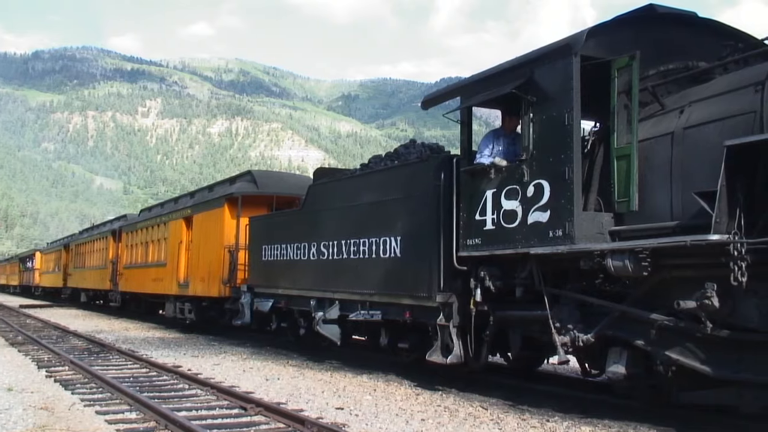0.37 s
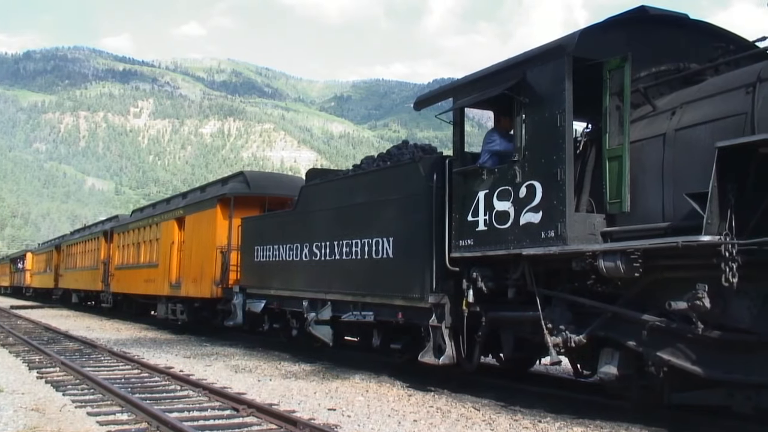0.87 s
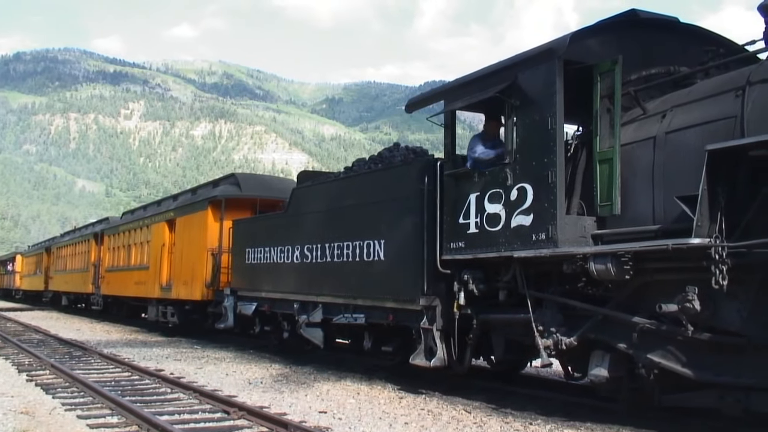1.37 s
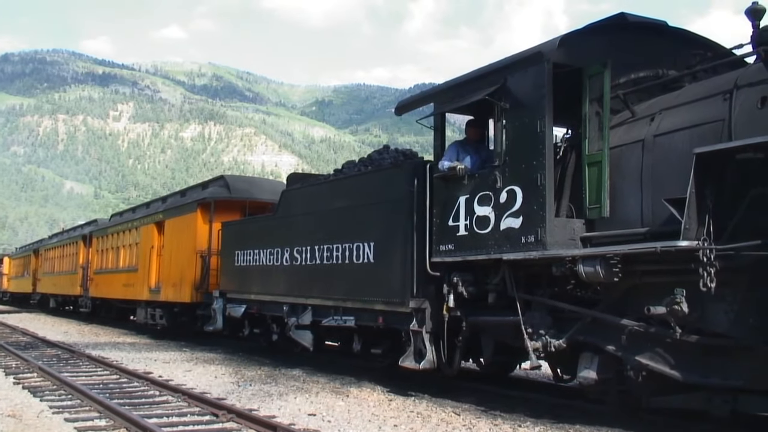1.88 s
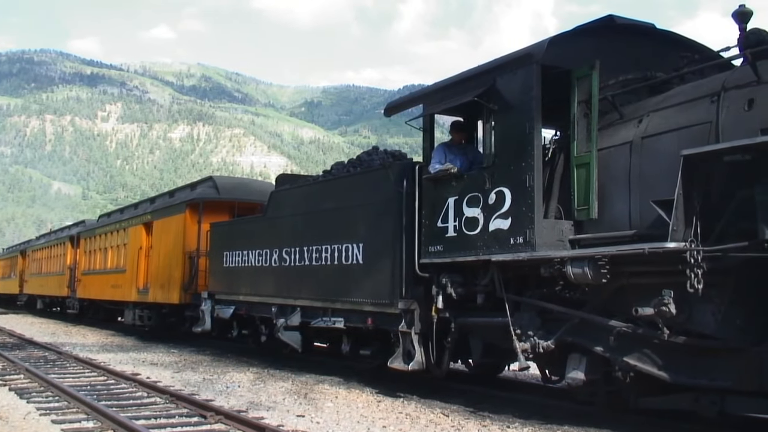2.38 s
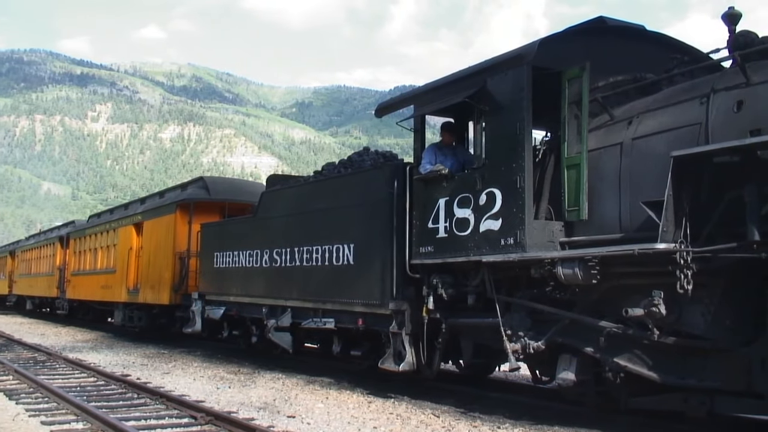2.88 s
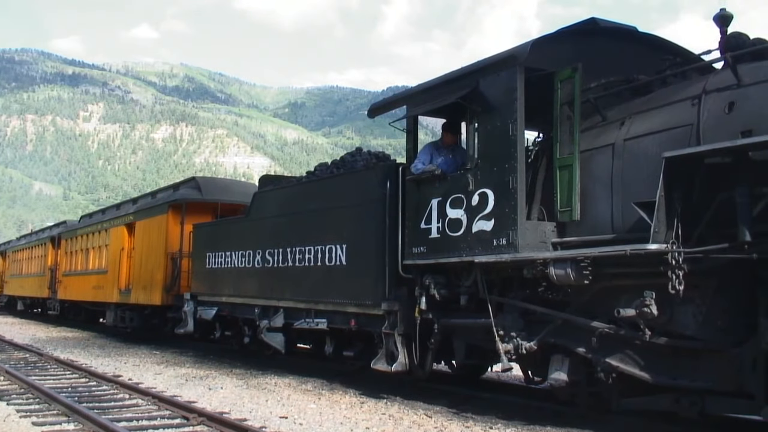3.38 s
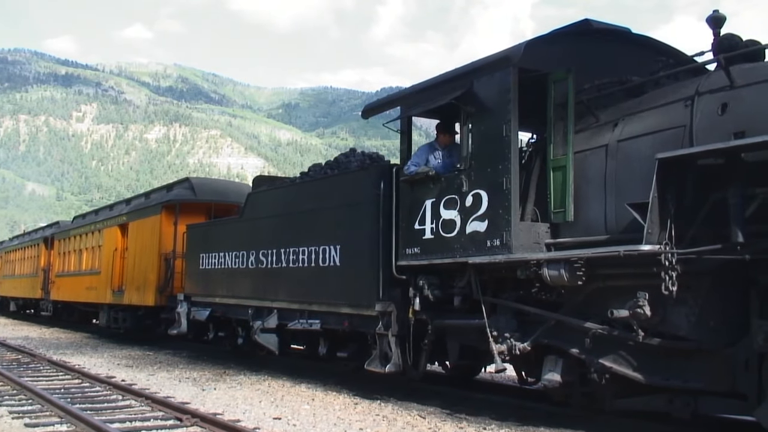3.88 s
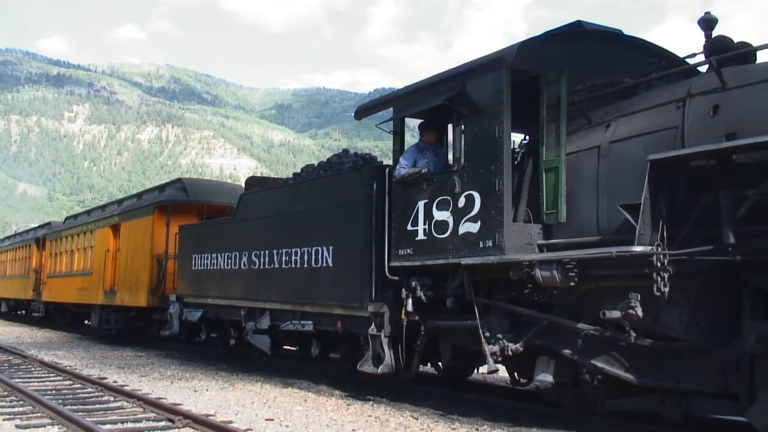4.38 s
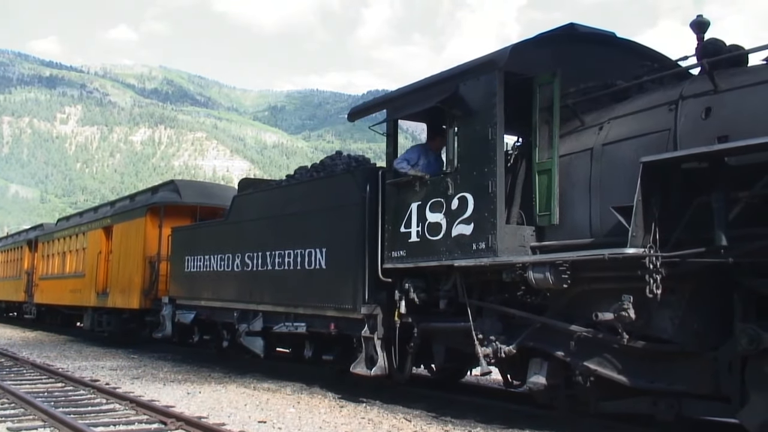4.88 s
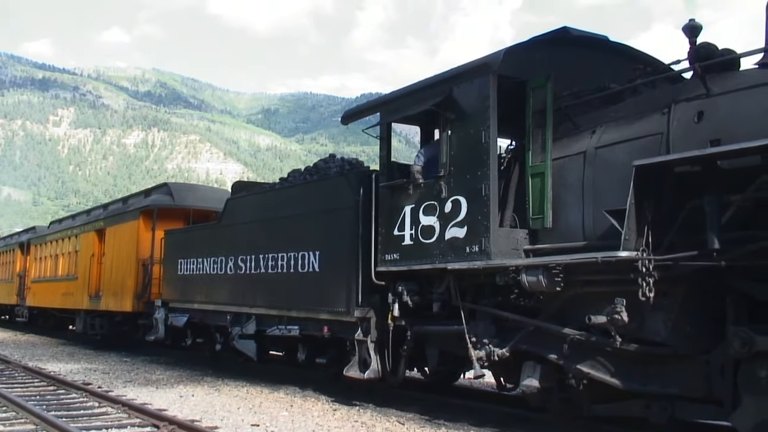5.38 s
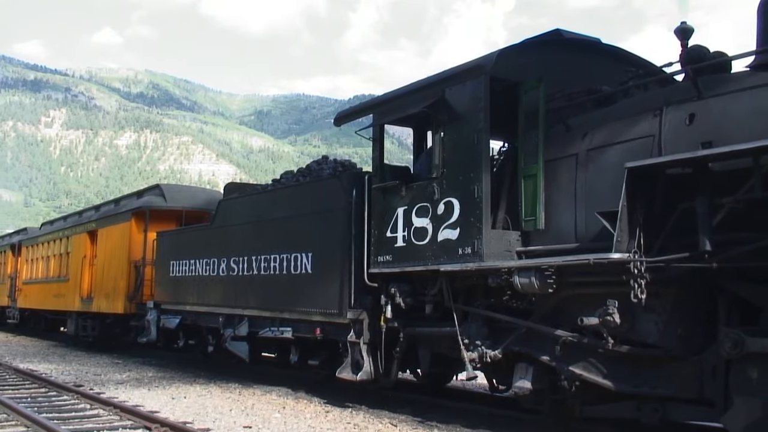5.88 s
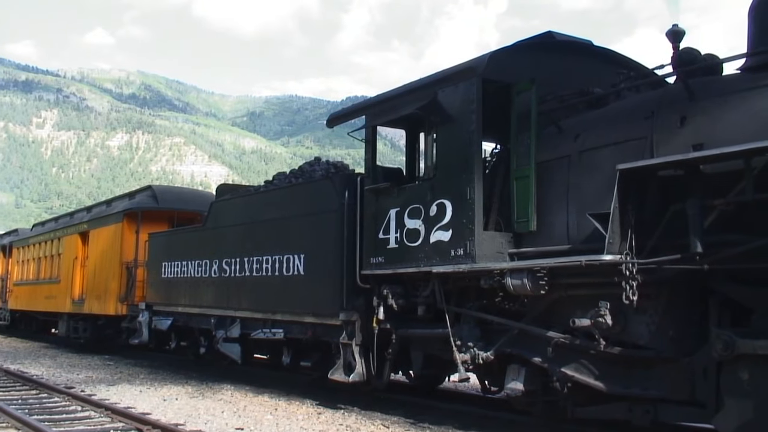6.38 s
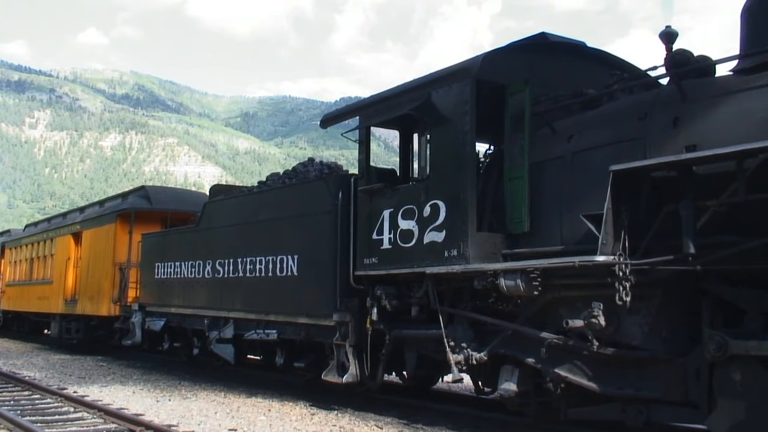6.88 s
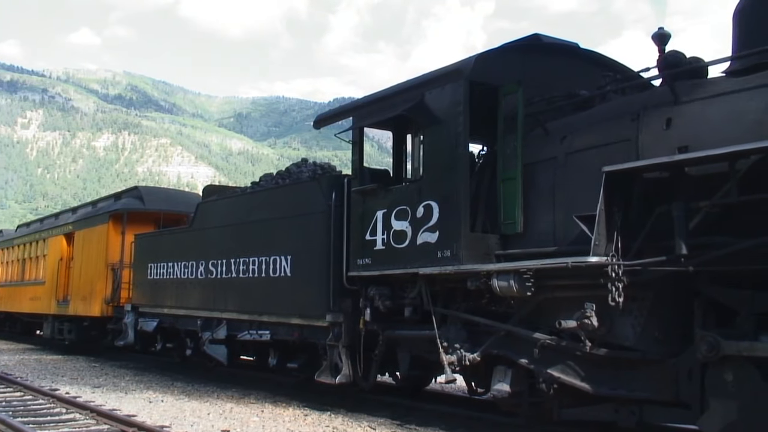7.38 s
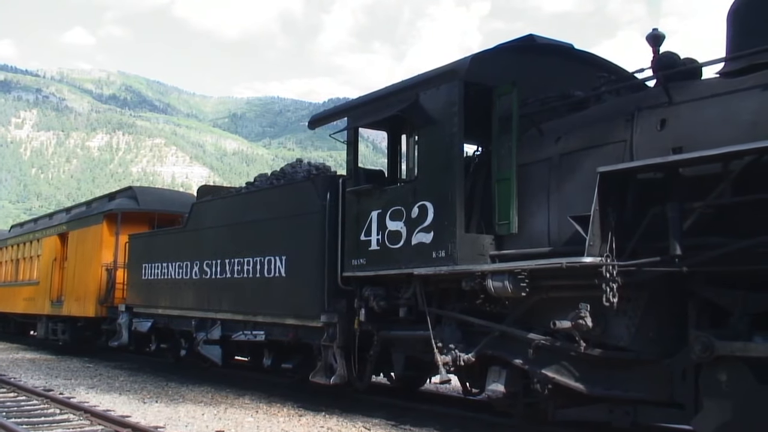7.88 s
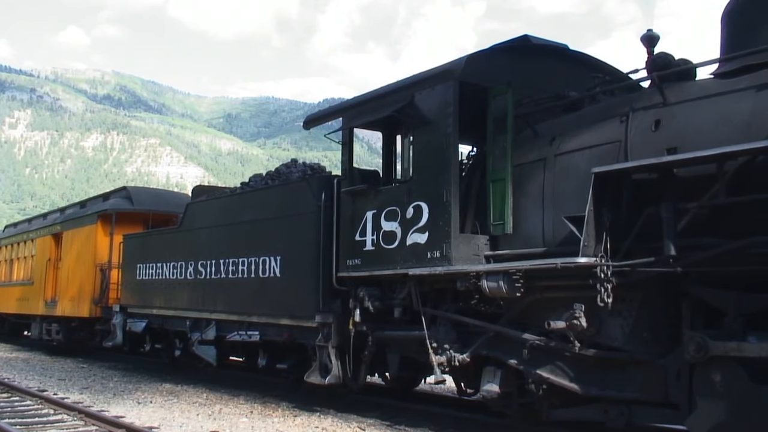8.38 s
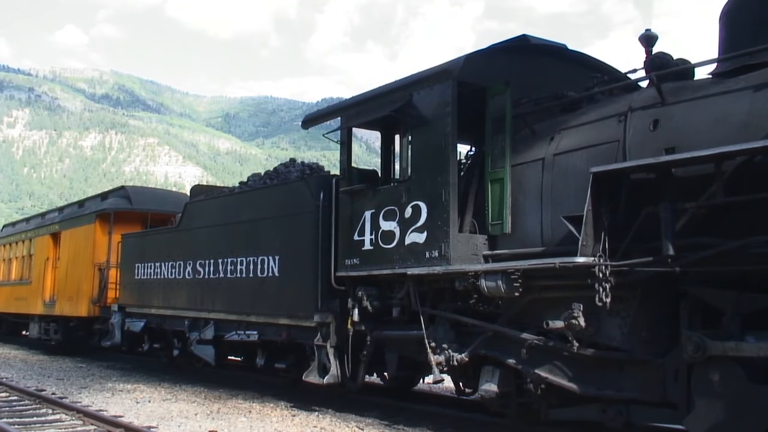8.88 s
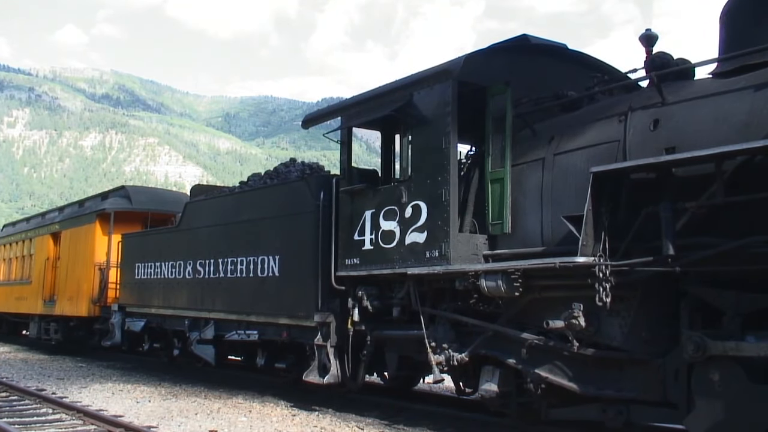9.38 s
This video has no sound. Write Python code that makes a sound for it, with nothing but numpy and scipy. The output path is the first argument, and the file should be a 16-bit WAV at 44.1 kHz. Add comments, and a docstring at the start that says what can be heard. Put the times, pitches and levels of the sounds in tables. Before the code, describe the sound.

A loud, continuous rush of steam hisses from a standing locomotive while a bell's last ring and a whistle's distant echo fade away.

```python
"""Steam locomotive blowing off steam

A locomotive stands to the left of a small two-port stereo microphone: its jet is noise shaped by frequency,
coloured by echoes off the ballast, with a treble that flutters in the moving air. The boiler hums faintly.
At the start the bell still rings out, as dying tones that beat slowly, and the last echoes of the whistle
come back from the hills as wavering tones."""
import sys
import numpy as np
from scipy import signal
from scipy.fft import rfft, irfft, next_fast_len
from scipy.io import wavfile
from scipy.ndimage import uniform_filter1d

SR = 44100
rng = np.random.default_rng(int(sys.argv[2]) if len(sys.argv) > 2 else 0)


def invert_db(x):
    """Field ratio 10**(x/20) for x, a level in decibels (scalar or array-like)."""
    u = np.asarray(x, float) / 20
    return 10 ** u


def master(y):
    """Save y as 16-bit WAV."""
    cut = np.clip(np.atleast_2d(y).T, -1, 1)
    pcm = np.round(cut * 32767)  # scale
    wavfile.write(sys.argv[1], SR, pcm.astype(np.int16))


N = 419391  # samples, about 9.5 s


def curve(table, s):
    """Read the columns of a table at the times s, with straight lines between rows."""
    rows = np.array(table)
    return [np.interp(s, rows[:, 0], column) for column in rows.T[1:]]


def spectrum(table, hz):
    """Read the columns of a table at the frequencies hz, with straight lines on a log-frequency axis."""
    rows = np.array(table)
    return [np.interp(np.log(hz), np.log(rows[:, 0]), column) for column in rows.T[1:]]


def bumps(s, at, length):
    """Bell-shaped rises to 1 around the given times, one row each; length is the standard deviation."""
    distance = (s - np.array(at)[:, None]) / np.array(length)[:, None]
    return np.exp(-.5 * distance ** 2)


def patches(shape, rows, columns):
    """Smooth random field of spread 1, made by averaging noise twice over this many rows and columns."""
    field = rng.standard_normal(shape)
    for _ in range(2):
        field = uniform_filter1d(field, rows, axis=0)
        field = uniform_filter1d(field, columns, axis=1)
    return field / field.std()


def narrow(hz, width, steady=0.):
    """Complex noise of power 1 in a narrow resonance: a wavering tone; steady 0-1 evens out its level."""
    f = np.fft.fftfreq(N, 1 / SR)
    random_phase = np.exp(2j * np.pi * rng.random(N))
    tone = np.fft.ifft(random_phase / (1 + (2 * (f - hz) / width) ** 2))
    tone = tone / abs(tone) ** steady
    return tone / np.sqrt(np.mean(abs(tone) ** 2))


def ports(tone, left_db, right_db, lead):
    """A complex tone as both ports hear it: each at its own level, the left ahead by lead radians."""
    left = invert_db(left_db) * (tone * np.exp(1j * lead)).real
    right = invert_db(right_db) * tone.real
    return np.sqrt(2) * np.array([left, right])


# How the loudness of the hiss and of its low roar drifts, unevenly, as random noise does.
# Each row: time in seconds, level of the body of the hiss in dB (before the port levels),
# low roar against the body in dB (its average is taken out).
JET = [(0.0, -23, 1), (0.06, -22.5, 1), (0.18, -26, 1), (0.33, -22, -0.5), (0.6, -23.8, -.5),
       (1.05, -22, -2), (1.3, -23.3, -1.5), (1.8, -25, -0.5), (2.6, -22.1, -1), (2.72, -23.5, -0.5),
       (2.92, -24.2, -0.5), (3.1, -22.5, -1), (3.55, -23.5, -0.5), (3.7, -24.5, -2), (4.35, -23.3, -1.5),
       (4.47, -25, -3), (4.8, -24, -2.5), (5.0, -23.5, -2.5), (6.5, -23.2, -0.5), (7.1, -24, -1),
       (7.6, -23, -1), (7.95, -23.5, 0), (8.35, -22.5, -1.5), (8.65, -23.5, -1), (8.95, -22, -1.5),
       (9.3, -23.5, -1), (9.51, -22.5, 0.5)]
# Swells and dips of the treble. Each row: time of the peak in seconds, length in seconds,
# change at the very top in dB, how many times as much of it the lower treble gets.
FLUTTER = [(.13, .04, 3.4, .3), (.29, .045, -5, 0.2), (.44, .03, -1.5, -1), (.59, .04, 3, .7),
           (.94, .09, -2.2, .6), (1.22, .06, 1.2, .0), (1.36, .1, -.5, 3.), (1.49, .05, -2.5, .6),
           (1.84, .09, 2.2, -0.5), (2.1, .05, -2, 0.3), (2.35, .08, -2, .3), (2.54, .065, -4.5, 1.3),
           (2.73, .04, 2.5, 0.2), (2.87, .06, 2.5, 1), (3.114, .045, -4.7, .6), (3.36, .05, 1, -0.5),
           (3.5, .03, -1.8, -1), (3.63, 0.066, 3.5, 1), (3.8, .07, 2.2, -0.1), (4.46, .06, 2.4, 0.8),
           (4.67, 0.11, 1.5, .8), (4.96, .04, -2, .5), (5.79, .04, -1.2, 1.8), (6.38, .04, 1.7, .8),
           (6.85, .07, 1.3, 1.5), (7.32, .04, 1, .7), (7.65, .08, -1, .6), (7.92, .07, -2, 1.3),
           (8.2, .035, 1.8, -1), (8.38, 0.088, -1.4, 1.5), (8.63, .06, 2, .5), (9.0, 0.098, -2.5, .3),
           (9.23, .06, 1, 1.3), (9.48, .08, -1.2, .4)]


def turbulence():
    """Rushing steam is random noise: one part both ports share and one for each port alone."""
    roar_hz, treble_hz, top_hz = 700, 6000, 9800  # where the three regions of the spectrum begin or end
    patchy_db, flicker_db = 0.65, 0.68
    far_share = 0.27  # how much of the flutter reaches the right port's own noise
    treble_follows = 0.1  # how much of the body's swells the direct treble follows
    hz, s, noise = signal.stft(rng.standard_normal((3, N)), SR, nperseg=1024)
    hz = hz[:, None] + 1  # avoids dividing by zero
    roar = 1 / (1 + (hz / roar_hz) ** 3)
    treble = 1 / (1 + (treble_hz / hz) ** 7)
    top = 1 / (1 + (top_hz / hz) ** 9)

    jet_db, roar_db = curve(JET, s)
    grid = noise.shape[1:]
    db = jet_db + roar * (roar_db - roar_db.mean())
    db = db + patchy_db * patches(grid, rows=25, columns=9)

    at, length, depth_db, share = np.array(FLUTTER).T
    shape = bumps(s, at, length)
    lower_db = (depth_db * share) @ shape
    top_db = depth_db @ shape
    # the direct treble path shimmers and follows the swells of the body only in part
    flicker = flicker_db * patches(grid, rows=140, columns=3)
    flicker = flicker - (1 - treble_follows) * (jet_db - jet_db.mean())
    flutter_db = treble * ((1 - top) * lower_db + top * top_db + flicker)
    # the shadowed right port hears little of that in its own noise
    hears = np.array([1, 1, far_share])[:, None, None]
    return signal.istft(noise * invert_db(db + hears * flutter_db), SR, nperseg=1024)[1][:, :N]


# How alike the two ports hear the jet. Each row: frequency in Hz, likeness from 0 to 1,
# radians by which the left leads beyond the travel time.
LIKENESS = [(58.3, 1, 0), (80, 0.34, 2), (130, 0.73, 2), (200, .97, 1.63), (364, 0.94, 1.77),
            (428, 0.53, 2), (593, 1, 0.98), (720, 0.57, .5), (948, 0.98, 0.76), (1370, 0.7, 1.5),
            (1460, 0.87, 1.), (2500, 0.7, 1.08), (4000, 0.6, 0.68), (8000, 0.5, 1.28), (15000, 0.16, 2.5)]


def between_ports(shared, own, hz):
    """Sound meets the left port first; the less alike the ports are, the more of its own noise each gets."""
    lag_ms = .33  # travel time from the left port to the right
    like, lead = spectrum(LIKENESS, hz)
    like = np.clip(like, 0, 1)
    late = np.exp(-1j * (lead + 2 * np.pi * hz * lag_ms / 1000))
    common = shared * np.array([np.ones_like(late), late])
    return np.sqrt(like) * common + np.sqrt(1 - like) * np.array(own)


# Resonances of pipework and microphone housing. Each row: frequency in Hz, width in Hz,
# left boost in dB, right boost in dB (below zero is a dip).
RESONANCES = [(72, 5, -2.0, 7.8), (129, 12, 1.7, 7.1), (171, 17, 3.7, 7.2), (253, 44, 7.5, 4.2),
              (321, 65, 5.8, 4.6), (487, 7, 5.9, 4.0), (560, 45, 1.9, 1.9), (705, 28, -2.7, -1.3),
              (975, 100, 3.8, 1.3), (1100, 60, 1.6, -2.0), (1152, 208, 1.1, 8.4), (1373, 46, 3.0, -2.1),
              (1490, 165, 2.6, 1.8), (1836, 168, 2.0, 2.5), (1988, 36, -2.5, 0.0), (2291, 69, -1.7, -0.6),
              (2493, 92, 2.5, -0.9), (2811, 151, 1.0, 2.7), (3519, 61, -2.7, 0.7), (3785, 105, -3.3, 2.8),
              (4049, 389, 3.7, 2.2), (4612, 112, -0.7, 1.1), (4790, 93, 2.0, 3.8), (5670, 91, 1.5, 2.1),
              (5983, 166, -2.9, -0.2), (8296, 252, -0.7, -0.9), (9112, 1271, 1.7, 2.4)]


def resonances(hz):
    """Pipework and housing boost or weaken narrow bands, by different amounts at each port; gives dB."""
    db = 0
    for f, width, *both_db in RESONANCES:
        db = db + np.array(both_db)[:, None] / (1 + (2 * (hz - f) / width) ** 2)
    return db


# Reflections off the ballast. Each row: left delay in ms, right delay in ms, left gain, right gain
# (gains are factors), frequency in Hz above which the reflection is duller.
ECHOES = [(3.34, 3.24, .52, .4, 420), (1.21, 1.17, .08, .15, 2070), (7.23, 6.99, -.22, -.1, 270)]


def reflections(hz):
    """A delayed copy strengthens some frequencies and weakens others; only that colouring is kept."""
    comb = 1
    for left_ms, right_ms, left, right, dull_hz in ECHOES:
        delay = np.exp(-2j * np.pi * np.outer([left_ms, right_ms], hz) / 1000)
        comb = comb + np.array([[left], [right]]) * delay / np.sqrt(1 + (hz / dull_hz) ** 2)
    return abs(comb)


# Basic tone colour of the jet at each port. Each row: frequency in Hz, left level in dB, right level in dB
# (relative levels, before the overall boost).
PORTS = [(30, -28.3, -31), (60, -24, -25), (100, -31.3, -16.5), (130, -25.5, -20.5), (200, -24.5, -13.5),
         (330, -26, -16.5), (620, -13.5, -15.5), (897, -10.0, -13.5), (1460, -3, -9), (3030, -2.5, -9.5),
         (5970, -6, -14.5), (10700, -9, -22.5), (13100, -4.5, -23.5), (15600, -5.5, -26)]


def steam():
    """The jet's noise, coloured by its path to each port, by resonances and by reflections."""
    level_db, scatter_db = 12, 0.95  # overall boost, spread of the fine ripple
    size = next_fast_len(N)
    hz = np.maximum(np.fft.rfftfreq(size, 1 / SR), 1)
    shared, *own = rfft(turbulence(), size)
    mix = between_ports(shared, own, hz)
    db = np.array(spectrum(PORTS, hz)) + resonances(hz) + level_db
    # countless weak reflections off rods and wheels leave a fine fixed ripple, different at each port
    db = db + scatter_db * patches((2, len(hz)), rows=1, columns=300)
    return irfft(mix * invert_db(db) * reflections(hz), size)[:, :N]


# Partial tones of the bell. Each row: frequency in Hz, left level in dB, right level in dB,
# seconds to fall by 60 dB, radians by which the left leads, beats in Hz, beat depth from 0 to 1.
BELL = [(522.5, -47, -47, 16, 2.3, .95, .4), (1050.3, -34.5, -33.5, 13, 2.55, .3, .15),
        (1572, -48, -54, 9, -1., 1.8, .5), (1695.6, -33.5, -37.5, 6.5, -2.1, 1.9, .3),
        (2716, -44, -50, 4, .4, 1.3, .3)]


def bell(s):
    """Partials die away; each is a close pair of tones and so beats slowly."""
    out = 0
    for hz, left_db, right_db, t60, lead, beat_hz, depth in BELL:
        ring = np.exp((2j * np.pi * hz - np.log(1000) / t60) * s)
        beat = (1 + depth * np.exp(2j * np.pi * beat_hz * s)) / (1 + depth)
        out = out + ports(ring * beat, left_db, right_db, lead)
    return out


# Whistle echoes. Each row: time in seconds, then the levels in dB of the low, middle and high groups
# (before the levels of the single tones are added).
WHISTLE = [(0.0, -51, -32.5, -44), (0.08, -54, -46, -43), (0.3, -56.5, -39, -47), (0.45, -62, -41, -51),
           (0.66, -65, -38, -45), (0.72, -52, -44, -43), (0.87, -61, -45, -49), (1.03, -62, -51, -51)]
# Whistle chimes, overtones and a low boom that returns with them, in three groups: low, middle and high.
# Each row: frequency in Hz, width in Hz, left level in dB, right level in dB (both added to the
# group's level), radians by which the left leads.
CHIMES = [
    [(172.5, 12, 1, 9.5, 1.7), (409, 3, 6.5, 8.5, 1.7)],
    [(660, 31, -8, -7, 1.2), (706, 28, -3.5, -3.5, 1), (735, 40, -8, -8, 1.1), (780, 45, -5, -4, 1),
     (888, 40, -9, -7, 1.8)],
    [(977, 16, 6, 4, 2.6), (1004, 20, 3, 5, 2.1)],
]


def whistle(s):
    """The hills smear each chime into a wavering tone; every echo rises quickly and dies away by one law."""
    rise_s, fall_db_per_s = 0.037, 85
    span = 2 * SR  # the echoes are played for two seconds
    at, *levels_db = np.array(WHISTLE).T
    age = s[:span] - at[:, None]
    rise = bumps(age, 0 * at, rise_s + 0 * at)
    fall = invert_db(-fall_db_per_s * np.maximum(age, 0))
    shape = np.where(age < 0, rise, fall)
    out = 0
    for db, group in zip(levels_db, CHIMES):
        loudness = np.sqrt(invert_db(db) ** 2 @ shape ** 2)  # overlapping echoes add in power
        loudness = np.pad(loudness, (0, N - span))
        for hz, width, left_db, right_db, lead in group:
            out = out + loudness * ports(narrow(hz, width, steady=.7), left_db, right_db, lead)
    return out


# Swells of the hum. Each row: time of the peak in seconds, length in seconds,
# level in dB (before the port levels), pitch in Hz.
HUM = [(0.07, .04, -52, 97), (0.8, .06, -56, 100), (2.07, .06, -53, 97), (2.24, .09, -51, 98.2),
       (2.54, 0.055, -49, 93), (2.92, .07, -55, 99.2), (5.2, .05, -53, 101), (6.12, .05, -54, 99),
       (6.3, .06, -55, 101), (6.65, .2, -55.5, 99), (7.36, .05, -56, 99), (8.1, .05, -50.5, 99),
       (8.86, .04, -54, 92), (9.12, .07, -48.5, 97), (9.47, .05, -53, 99)]


def hum(s):
    """A low wavering tone from the boiler that swells now and then, strongest in the right port."""
    tone = invert_db(-63) * narrow(97, width=12)  # faint and always there, in dB and Hz
    for at, length, db, hz in HUM:
        near = slice(int(max(at - 4 * length, 0) * SR), int((at + 4 * length) * SR))
        swell = invert_db(db) * bumps(s[near], [at], [length])[0]
        tone[near] += swell * np.exp(2j * np.pi * hz * s[near])
    return ports(tone, left_db=-14, right_db=5, lead=2.7)


def scene():
    """Jet, bell, whistle echoes and hum together."""
    s = np.arange(N) / SR
    return steam() + bell(s) + whistle(s) + hum(s)


def band_limit(x):
    """A steep low-pass at the top of the band."""
    return signal.sosfilt(signal.butter(12, 16740, fs=SR, output="sos"), x)


def record(dry):
    """A steep low-pass filter removes the very top of the treble."""
    top_hz = 15740
    low_pass = signal.ellip(12, .3, 60, top_hz, fs=SR, output="sos")
    mix = signal.sosfilt(low_pass, dry)
    return band_limit(mix)


dry = scene()
out = record(dry)
master(out)
```